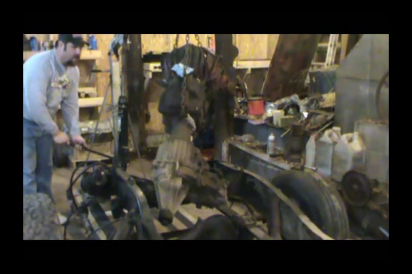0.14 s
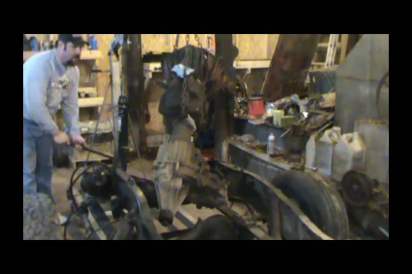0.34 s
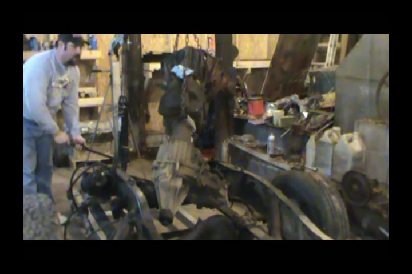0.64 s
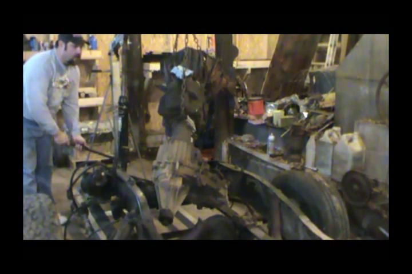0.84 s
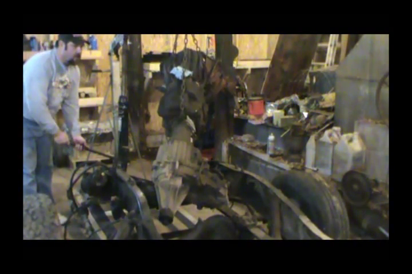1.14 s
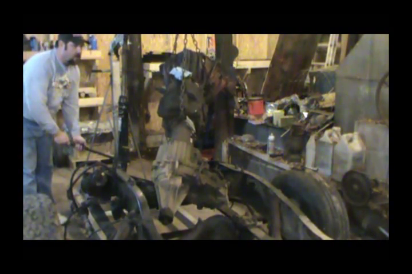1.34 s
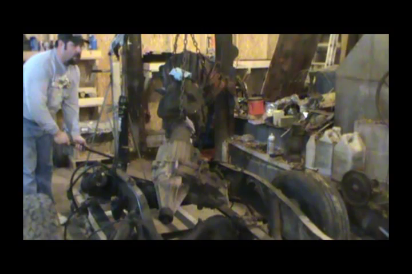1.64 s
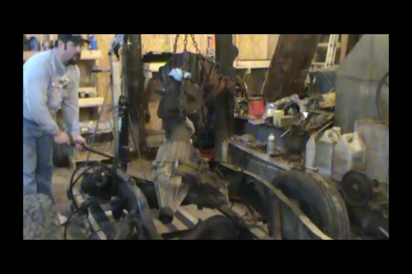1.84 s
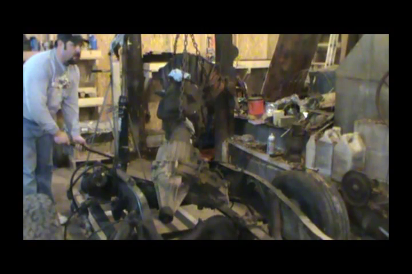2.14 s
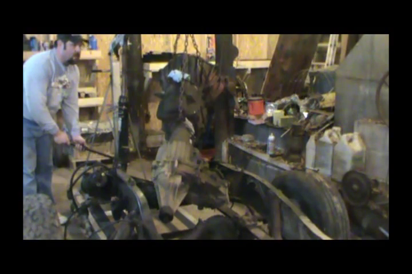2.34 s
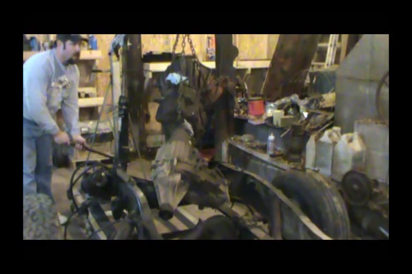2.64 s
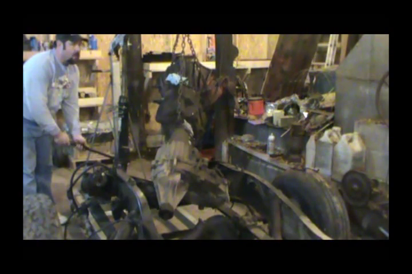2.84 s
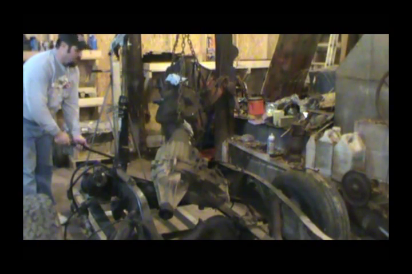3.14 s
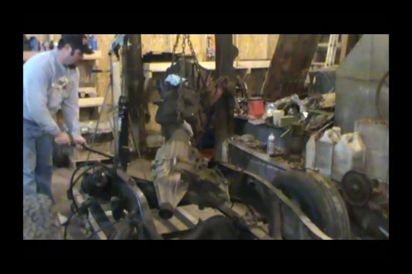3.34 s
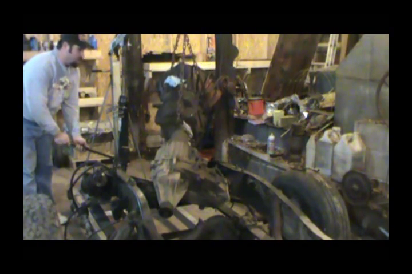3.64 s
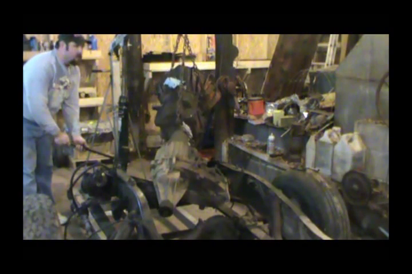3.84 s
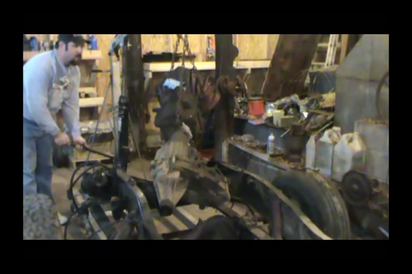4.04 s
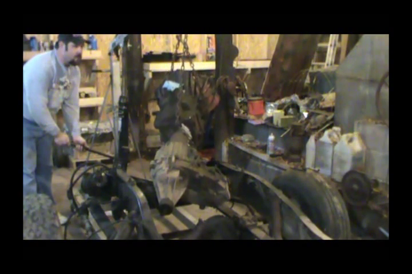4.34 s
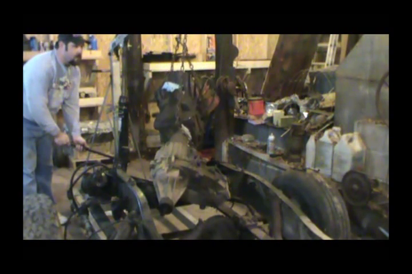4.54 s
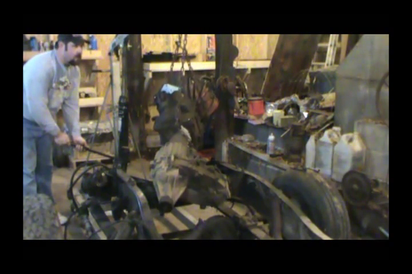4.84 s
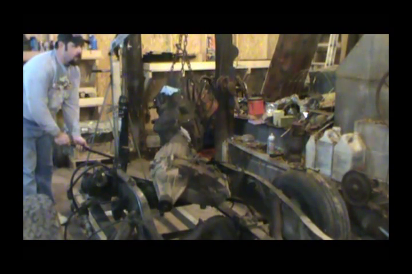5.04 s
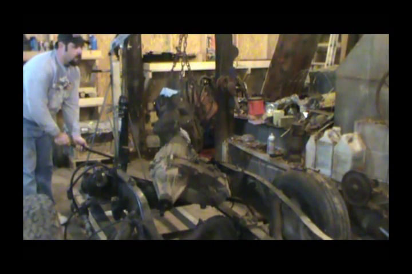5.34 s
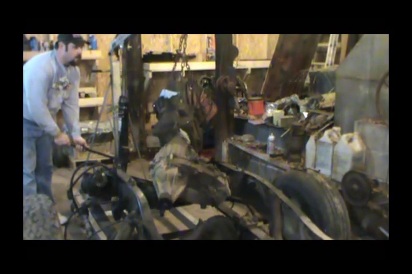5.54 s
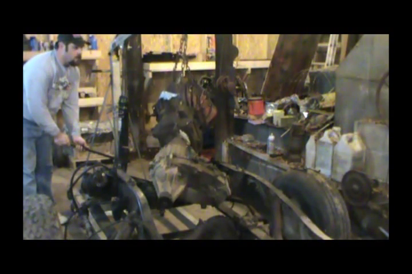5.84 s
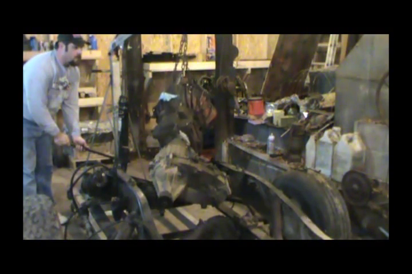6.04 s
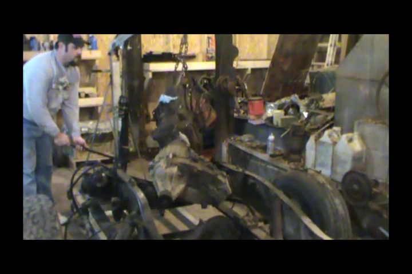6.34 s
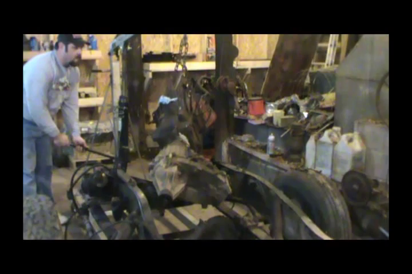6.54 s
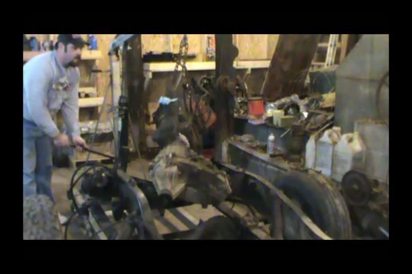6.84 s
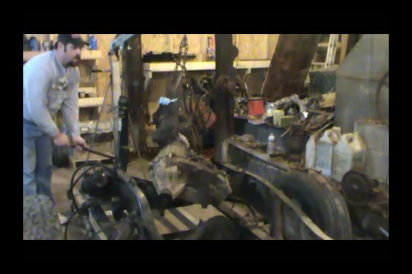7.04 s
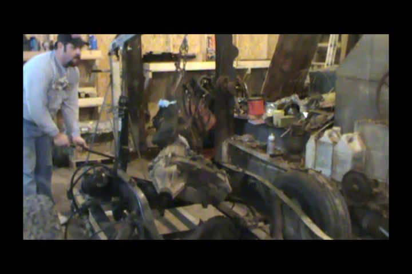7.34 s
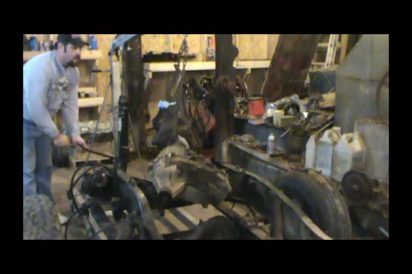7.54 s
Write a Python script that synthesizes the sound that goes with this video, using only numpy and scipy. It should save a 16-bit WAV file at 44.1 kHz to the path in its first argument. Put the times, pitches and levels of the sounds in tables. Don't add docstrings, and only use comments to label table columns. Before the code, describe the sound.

Quiet workshop hiss, faint ticking and slack chain, then irregular loud metallic knocks of heavy castings, ringing briefly through crane steel and wooden room.

```python
import sys
import numpy as np
from scipy import signal
from scipy.fft import rfft, irfft, next_fast_len
from scipy.io import wavfile
from scipy.ndimage import uniform_filter1d, map_coordinates

SR = 44100
rng = np.random.default_rng(int(sys.argv[2]) if len(sys.argv) > 2 else 0)


def dump(signal):
    limited = np.clip(np.atleast_2d(signal).T, -1, 1)
    pcm = np.round(limited * 32767).astype(np.int16)
    wavfile.write(sys.argv[1], SR, pcm)


def amplitude_ratio(level_db):
    exponent = np.asarray(level_db, float) / 20
    return 10 ** exponent


N = 339570

# (time [s], peak at 400-1500 Hz [dB], bite [dB], edge [dB], chatter length [s])
KNOCKS = [(2.442, -11.5, -5.5, -9, 0.027), (2.505, -14, 1, -8.5, 0.051), (2.539, -29, -4, 12, 0.017),
          (3.449, -25.5, 1.5, -11, 0.019), (3.478, -23, -4.5, -11, 0.024), (3.662, -11, -9, -19.5, 0.015),
          (3.759, -12, -5, -9, 0.023), (3.899, -11, -7.5, -20, 0.024), (4.035, -8.5, -12, -23, .02),
          (4.082, -17, 2.5, -3.5, 0.013), (4.291, -20.5, -8.5, -20.5, 0.0068),
          (4.372, -19, 0, -17.5, 0.0095), (4.864, -14.5, 0.2, -14, 0.016), (5.021, -9.5, -6, -21, 0.0089),
          (5.067, -24.5, -18, -13, 0.014), (5.112, -19.5, -9.5, -17, 0.022),
          (5.414, -7.5, -6, -17.5, 0.013), (5.487, -22, -0.5, -10, 0.0099), (6.087, -25, -0.5, -11, 0.032),
          (6.527, -13, -1, -9, 0.029), (7.152, -11, -7.5, -8.5, 0.012), (7.185, -18, -6, -16, 0.0046),
          (7.295, -13.5, -6.5, -18.5, 0.017), (7.519, -23, -6.5, -19, 0.0082)]
# (time [s], peak at 400-1500 Hz [dB], bite [dB], edge [dB], chatter length [s])
SCUFFS = [
    (0.0, -35, -8.5, -23, 0.0081),
    (0.105, -35, -9, -23, 0.054),
    (0.188, -30.5, -16, -16.5, 0.0082),
    (0.306, -41, -32, -40, 0.029),
    (0.715, -44, -62, -28, 0.012),
    (0.977, -42, -54, -39, 0.027),
    (1.299, -48, -3, -12, 0.027),
]


def unit(x):
    return x / np.sqrt(np.mean(x ** 2) + 1e-20)


def along(points, hz):
    f, v = np.transpose(points)
    return np.interp(np.log(hz + 1), np.log(f + 1), v)


def filtered(x, response):
    m = next_fast_len(x.shape[-1] + 8192)
    spectrum = rfft(x, m) * response(np.fft.rfftfreq(m, 1 / SR))
    return irfft(spectrum, m)[..., :x.shape[-1]]


def causal(points):
    gain = amplitude_ratio(along(points, np.fft.rfftfreq(4096, 1 / SR)))
    cepstrum = irfft(np.log(gain))
    cepstrum[1:2048] *= 2
    cepstrum[2049:] = 0
    return irfft(np.exp(rfft(cepstrum)))[:2048]


def modes_of(peaks):
    def response(f):
        total = 0
        for k, (centre, width, db) in enumerate(peaks):
            resonance = 1j * f * width / (centre * centre - f * f + 1j * f * width)
            total = total + (-1) ** k * amplitude_ratio(db) * resonance
        return total
    return response


def spread(pair, alike):
    def mid_and_side(hz):
        turn = np.arccos(np.clip(along(alike, hz), -1, 1)) / 2
        return np.array([np.cos(turn), np.sin(turn)])
    mid, side = filtered(pair, mid_and_side)
    return np.array([mid + side, mid - side])


def add(track, s, x):
    start = round(s * SR)
    part = track[..., start:start + x.shape[-1]]
    part += x[..., :part.shape[-1]]


def chatter(length):
    u = np.arange(SR // 4) / SR / np.clip(length, .0005, .2)
    luck = rng.standard_normal(len(u))
    sparse = luck * np.abs(luck)
    contacts = sparse * (u + 0.41) * np.exp(-u ** 2)
    return contacts / np.linalg.norm(contacts)


def swing(blows, t60, rise_s):
    energy, t = np.zeros(N), np.arange(int(1.5 * SR)) / SR
    rise = (1 - np.exp(-t / rise_s)) ** 2
    for s, db in blows:
        add(energy, s, amplitude_ratio(2 * (db - 60 * t / t60)) * rise)
    return np.sqrt(energy)


def shed(direct_db, length_s=.6):
    # (frequency [Hz], likeness [-1 to 1])
    echo_alike = [(60, 0.8), (150, 0.95), (380, 0.9), (950, 0.39), (2400, 0.41), (6000, 0.51),
                  (10000, 0.38), (15000, .98)]
    # (frequency [Hz], time to fall 60 dB [s])
    echo_t60 = [(80, 0.087), (250, 0.55), (600, 0.54), (1500, 0.52), (4000, 0.47), (10000, 0.26),
                (16000, 0.13)]
    size = int(length_s * SR)
    hz, t = np.fft.rfftfreq(256, 1 / SR), np.arange(size // 128 + 2) * 128 / SR
    z = .0765 * rng.standard_normal((2, len(hz), 2 * len(t))).view(complex)
    decay = amplitude_ratio(-60 * t / along(echo_t60, hz)[:, None])
    turn = np.arccos(np.clip(along(echo_alike, hz), -1, 1))[:, None] / 2
    mid, side = z * decay * [np.cos(turn), np.sin(turn)]
    tail = signal.istft(np.array([mid + side, mid - side]), SR, nperseg=256)[1][:, :size]
    tail = tail * (1 - np.exp(-np.arange(size) / SR / 0.0051))
    tail[:, 0] = amplitude_ratio(direct_db)
    return tail


def rush(spectrum, patchy_db):
    # (frequency [Hz], likeness [-1 to 1])
    quiet_alike = [(60, 0.99), (130, 1), (290, 0.95), (640, 0.72), (1410, -0.052), (3100, -0.33),
                   (6820, 0.22), (15000, 1)]
    z = signal.stft(rng.standard_normal((2, N)), nperseg=512)[2]
    field = uniform_filter1d(rng.standard_normal(z.shape[1:]), 4, 0)
    field = uniform_filter1d(field, 12, 1)
    pair = signal.istft(z * amplitude_ratio(patchy_db * unit(field)), nperseg=512)[1][:, :N]
    coloured = filtered(pair, lambda hz: amplitude_ratio(along(spectrum, hz)))
    return unit(spread(coloured, quiet_alike))


def hiss():
    # (frequency [Hz], density [dB per Hz])
    hiss_colour = [(880, -18), (1500, -2.5), (1910, 1), (2550, -4.5), (3590, -5), (15200, -10.5),
                   (16000, -12), (16500, -31)]
    return amplitude_ratio(-63) * rush(hiss_colour, patchy_db=.8)


def whine():
    # (frequency [Hz], level [dB rms])
    whine_tones = [(15735, -83)]
    t = np.arange(N) / SR
    return sum(amplitude_ratio(db + 7) * np.sin(2 * np.pi * hz * t) for hz, db in whine_tones)


def room_rumble():
    # (frequency [Hz], density [dB per Hz])
    rumble_colour = [(12, -70), (20, -18), (63, 1), (248, -4.5), (500, -7), (806, -12.5), (5000, -24.5),
                     (11000, -120)]
    rest_db, shake_db = -56.5, -40
    grows = 0.37
    shakes = [(s, shake_db + grows * db) for s, db, *_ in KNOCKS + SCUFFS[:3]]
    level = np.hypot(amplitude_ratio(rest_db), swing(shakes, t60=1.92, rise_s=0.019))
    return level * rush(rumble_colour, patchy_db=1.5)


def ticking_part():
    # (start [s], end [s], rate [ticks per second])
    tick_times = (1.1973, 2.2, 29.97)
    # (frequency [Hz], width [Hz], level [dB])
    tick_modes = [(1900, 11, 21), (3550, 130, 0), (4850, 130, -3.5)]
    start, end, rate = tick_times
    at = (np.arange(start, end, 1 / rate) * SR).astype(int)
    weak = np.arange(1, len(at) + 1) % 2
    scatter_db = 1.2 * rng.standard_normal(len(at)) - 3.5 * weak
    ticks = np.zeros(N)
    ticks[at] = amplitude_ratio(-22 + scatter_db)
    ring = modes_of(tick_modes)
    return filtered(ticks, lambda f: ring(f) * f ** 2 / (f ** 2 + 1500 ** 2))


def clean_notes(members):
    out, t = np.zeros(N), np.arange(N) / SR
    fine = np.arange(0, 8, .005)

    def wander():
        drift = map_coordinates(rng.standard_normal(200), [fine * 20])
        return np.interp(t, fine, drift)

    for modes, blows in members:
        for hz, t60, db in modes:
            size, phase = wander(), wander()
            level = swing(blows, t60, rise_s=.03) * amplitude_ratio(db + 6 + .8 * size)
            out += level * np.sin(2 * np.pi * hz * t + .3 * phase)
    return out


def crane_steel():
    # (frequency [Hz], time to fall 60 dB [s], level [dB])
    boom_notes = [(1518.5, .76, 0)]
    leg_notes = [(138, 1.15, 0)]
    mast_notes = [(429, .85, -1), (410, .65, 0)]
    plate_notes = [(1590, .5, -1), (1700, .45, 0)]
    brace_notes = [(1662, 1.25, 0)]
    beam_notes = [(97.3, 0.54, 3.5), (68, .35, -4)]
    lid_notes = [(1588, .33, 0)]
    # (time [s], level [dB])
    boom_blows = [(2.46, -23.5), (2.6, -32.5), (3.76, -36.5), (3.95, -34.5), (4.08, -35), (4.29, -36),
                  (4.39, -33), (4.88, -35), (5.05, -30.5), (5.42, -29.5), (6.1, -48), (6.535, -39),
                  (7.3, -37)]
    leg_blows = [(2.56, -45), (3.76, -43), (5.14, -47.5), (5.42, -44), (6.11, -54), (6.55, -35),
                 (7.17, -41), (7.3, -46.5)]
    mast_blows = [(4.04, -37), (5.03, -36.5), (6.56, -34), (7.17, -36), (7.3, -31)]
    plate_blows = [(2.5, -31), (2.56, -27), (2.95, -58), (4.09, -33), (4.38, -38), (4.88, -40), (5.42, -33),
                   (6.54, -35), (7.3, -43)]
    brace_blows = [(2.5, -49), (4.88, -50), (5.42, -47), (6.56, -45.5)]
    beam_blows = [(2.46, -47), (3.68, -45), (4.05, -44), (4.87, -48), (6.1, -53), (6.54, -38), (7.16, -45)]
    lid_blows = [
        (4.865, -32),
        (5.415, -37),
        (6.525, -24),
    ]
    # (frequency [Hz], time to fall 60 dB [s], time struck [s], level [dB])
    washer_hits = [
        (12400, .3, 6.545, -46),
        (9572, .2, 6.73, -57),
        (12400, .2, 7.19, -52),
    ]
    # (time [s], level [dB])
    rod_squeak = ([(3120, .8, -1.5)], [(.41, -67.5)])
    members = [(boom_notes, boom_blows), (leg_notes, leg_blows), (mast_notes, mast_blows)]
    members += [(plate_notes, plate_blows), (brace_notes, brace_blows)]
    members += [(beam_notes, beam_blows), (lid_notes, lid_blows), rod_squeak]
    members += [([(hz, t60, 0)], [(s, db)]) for hz, t60, s, db in washer_hits]
    return clean_notes(members)


def snaps():
    # (time [s], peak at 6-15 kHz [dB], 2-5 kHz part [dB])
    hard_contacts = [(1.1797, -56, -1), (2.2104, -43, -4), (2.2752, -22, 20), (2.4447, -7.5, 8.5),
                     (2.723, -32, -6), (2.944, -32, -21), (3.117, -37.5, -2), (3.264, -29.5, 0),
                     (3.452, -28, 19), (3.7627, -19, 11), (4.0346, -25.5, 19), (4.375, -27.5, 4),
                     (4.8678, -14, -9.5), (4.9594, -35, 6), (5.017, -21, 2), (5.208, -33, -6),
                     (5.2332, -21, 6.5), (5.258, -14.5, -18), (5.335, -27, -14), (5.411, -13.5, 7),
                     (5.4912, -11.5, -5), (5.5184, -23, -12), (5.7672, -18, -29), (5.932, -35, 1),
                     (6.112, -22.5, -19), (6.737, -31.5, -10.5), (6.526, -29, 7), (7.151, -15, -8),
                     (7.2974, -42, 3), (7.5203, -43, 2)]
    out = np.zeros((2, N))
    for s, db, bite_db in hard_contacts:
        colour = [(500, bite_db - 22.0), (3000, bite_db), (7000, 4), (10000, 8.0), (13000, 1.5), (18000, -40)]
        contacts = chatter(length=0.0018)[:SR // 20]
        click = signal.fftconvolve(contacts, causal(colour))
        answer = shed(direct_db=28.0, length_s=1 / 3)
        add(out, s, amplitude_ratio(db - 20.5) * signal.fftconvolve(click[None], answer, axes=1))
    return out


def struck_parts():
    castings = {"housing": [(540, 140, -1), (1100, 110, -5), (1566, 23, 2.5), (2060, 23, -22),
                (2940, 120, 0)], "flange": [(500, 100, -5.5), (862, 27, 2.5), (1122, 21, 0.5),
                (1530, 250, -37), (2220, 20, -14), (2530, 76, -9.5)], "bracket": [(1072, 17, -10.5),
                (1608, 45, -5.5), (2540, 480, -7.5), (3220, 49, 1), (3750, 59, -8)]}
    shells = {"sump": [(536, 76, 0), (851, 26, -20), (1230, 29, -5.5), (1592, 32, 0), (2240, 64, -11),
              (3660, 200, -10.5)], "cover": [(535, 103, 1), (857, 20, -7), (1600, 55, 1), (2060, 35, -2),
              (2700, 115, -1), (3300, 29, -6)], "pan": [(510, 133, -1), (870, 46, -7), (1090, 39, -4.5),
              (1520, 81, -8), (2093, 41, -6)], "bell": [(900, 160, -8.5), (1710, 65, -0.5),
              (2090, 40, -2.5), (2710, 140, -3.5)], "lug": [(617, 35, -6), (1117, 29, 2.5), (2560, 130, 1),
              (3220, 64, -4)]}
    gear = {"hook": [(603, 34, 0), (1608, 61, -1), (2650, 180, 1.5), (3400, 88, -1.5), (3720, 60, -2.5),
            (7750, 190, -3.5), (8260, 150, -7), (9300, 430, -7)], "shackle": [(2070, 104, 3),
            (3377, 67, 1.5), (4230, 150, -1.7), (6630, 65, -6), (7900, 44, -14), (10500, 62, -14),
            (12400, 44, -17)], "ring": [(2220, 140, 3), (4500, 160, 2), (6800, 88, -0.5), (7880, 60, -2)],
            "swivel": [(4350, 150, 0), (6500, 200, -6), (8640, 250, 2), (11050, 250, 0)],
            "pin": [(4390, 120, -2.5), (6740, 33, 0), (7150, 104, 1.5)], "link": [(6260, 150, -9),
            (7700, 46, 5), (8100, 140, 2.5), (10400, 100, -8), (13900, 58, -19)], "rust": [(4100, 2700, 14),
            (9650, 440, 4.5)]}
    clutter = {"crate": [(307, 55, -4), (394, 31, 2), (449, 33, -5.5)], "strap": [(2070, 240, 5),
               (3270, 430, 8)], "tin": [(2980, 280, 11), (4360, 35, -18), (9600, 71, 0)],
               "can": [(744, 54, -5), (2000, 58, -7), (2680, 86, -7)], "eye": [(3780, 52, -5),
               (3980, 81, -7), (5300, 43, -6)]}
    # (time [s], part, level [dB],
    # chatter length [s], hardness [dB per octave])
    strikes = [(0.194, "tin", -52.5, 0.0081, 6), (.2, "crate", -39, 0.055, 0),
               (0.421, "tin", -63, 0.11, 3.5), (1.868, "can", -54.5, 0.034, -3),
               (2.285, "shackle", -56, 0.021, -5), (2.468, "bracket", -22.5, 0.072, -7),
               (2.72, "rust", -45.5, 0.056, 8), (2.953, "hook", -37.5, 0.015, 1.5),
               (3.117, "hook", -42.5, 0.015, 0), (3.267, "ring", -42, 0.012, 1),
               (3.472, "housing", -27, 0.025, -11), (3.9, "housing", -22, 0.012, -3),
               (4.083, "pin", -24.5, 0.017, -2), (4.375, "eye", -37, 0.0085, -15),
               (4.632, "rust", -52.5, 0.092, 7), (4.796, "rust", -51, 0.045, 6),
               (4.873, "cover", -19.5, 0.013, -0.5), (5.021, "flange", -19, 0.012, 3),
                     (5.231, "swivel", -37, 0.034, 0), (5.255, "shackle", -31.5, 0.053, 3),
                     (5.411, "bracket", -20.5, 0.041, -10.5), (5.493, "link", -32.5, 0.012, -4),
                     (5.768, "hook", -42.5, 0.019, 1), (5.927, "shackle", -51, 0.032, -14),
                     (6.098, "strap", -29.5, 0.032, -2), (6.528, "sump", -20, 0.013, 0),
                     (7.154, "flange", -21.5, 0.0069, 3), (7.298, "pin", -34.5, 0.029, -7),
                     (7.3, "pan", -22, 0.015, -0.5), (7.515, "eye", -44, .014, -2),
               (1.46, "strap", -62, 0.017, -6),
        (2.443, "lug", -26, .008, -1),
        (2.53, "bell", -20, 0.06, 1),
        (3.664, "pan", -29.5, 0.0083, -6),
        (6.582, "sump", -28, .008, 1),
        (7.205, "pan", -29, .006, -2),
    ]
    parts = castings | shells | gear | clutter
    out = np.zeros((2, N))
    for s, part, db, length, hard_db in strikes:
        peaks = [(hz, 2.33 * width, level + hard_db * np.log2(hz / 1000)) for hz, width, level in parts[part]]
        damped = modes_of(peaks)
        jingle = filtered(chatter(length), lambda f: damped(f) ** 2)
        jingle /= np.linalg.norm(jingle)
        add(out, s, amplitude_ratio(db) * signal.fftconvolve(jingle[None], shed(direct_db=30.0), axes=1))
    return out


def clanks():
    # (frequency [Hz], width [Hz], level [dB])
    iron_modes = [(599, 76, -7), (877.5, 36.5, 6), (1135, 150, -16.5), (1612, 23, 7.5), (2057, 9.7, 0.5),
                  (2595, 50, -49), (4500, 84, -8), (4760, 12, -51), (5400, 45, -17), (6340, 40, -50),
                  (6460, 45, -10), (7600, 15, -49), (7420, 190, -4.5), (7810, 17, -7)]
    # (time [s], peak at 400-1500 Hz [dB], bite [dB], edge [dB], chatter length [s])
    rattles = [(1.172, -68.5, 16, 1, 0.0075), (1.866, -57, 10.5, -1.5, 0.026), (2.205, -52, 9, 10.5, 0.014),
               (2.272, -31.5, 5.5, -4.5, 0.0063), (2.945, -42.5, 3.5, 2.5, 0.011),
               (3.116, -53, 13, 0, 0.008), (3.275, -47.5, 9, 8, 0.098), (5.241, -48, 12.5, 21.5, 0.015),
               (5.764, -52.5, 17.5, 7, 0.016), (5.932, -46, -0.5, -0.5, 0.0091),
               (6.36, -39.5, 0, -20, 0.0049)]
    out = np.zeros((2, N))
    for rows, thud_db in ((KNOCKS, -12.5), (rattles, -4.5), (SCUFFS, -2.5)):
        for s, db, bite_db, edge_db, length in rows:
            contacts = chatter(length)
            iron = contacts + amplitude_ratio(4.5) * filtered(contacts, modes_of(iron_modes))
            colour = [(30, thud_db - 12.5), (180, thud_db + 13.0), (750, 4.37), (3000, bite_db + 4.0),
                      (9000, edge_db), (13500, edge_db - 16.5), (17000, edge_db - 16)]
            blow = signal.fftconvolve(iron, causal(colour))
            add(out, s, amplitude_ratio(db) * signal.fftconvolve(blow[None], shed(direct_db=23.5), axes=1))
    return out


def scene():
    # (frequency [Hz], left minus right [dB])
    lean = [(60, 1.5), (180, 1.5), (550, -1), (1650, -2), (4970, -1), (15000, 3.5)]
    room = room_rumble() + hiss() + ticking_part() + whine()
    metal = crane_steel() + snaps() + struck_parts() + clanks()
    return filtered(metal, lambda hz: amplitude_ratio(along(lean, hz) * [[.5], [-.5]])) + room


def top_cut(x):
    return signal.sosfilt(signal.butter(12, 17030, fs=SR, output="sos"), x)


def record(dry):
    top = [(15600, 1.5), (16100, -18), (17500, -30)]  # (frequency [Hz], gain [dB])
    heard = filtered(dry, lambda hz: amplitude_ratio(along(top, hz)))
    soft = heard / (1 + np.abs(heard / .7) ** 6) ** (1 / 6)
    return top_cut(soft)


dry = scene()
out = record(dry)
dump(out)
```